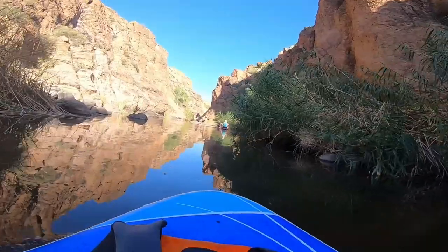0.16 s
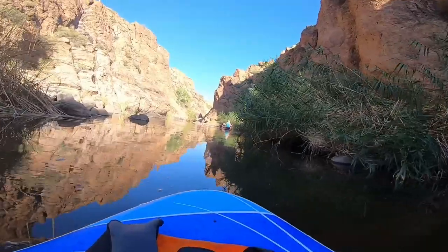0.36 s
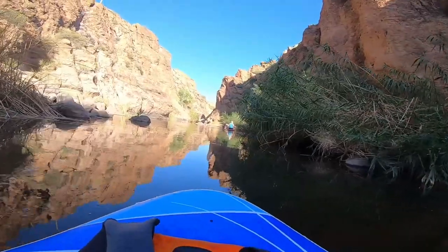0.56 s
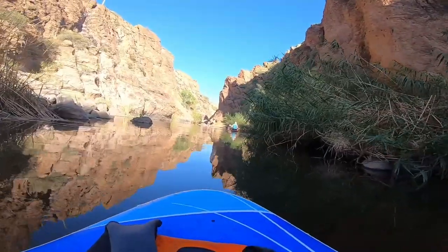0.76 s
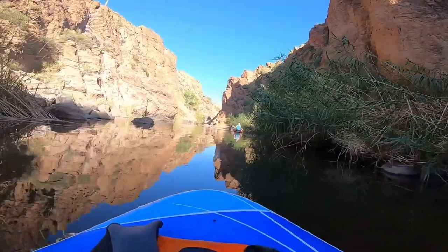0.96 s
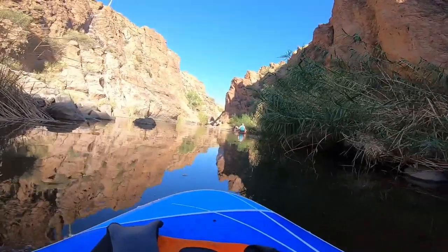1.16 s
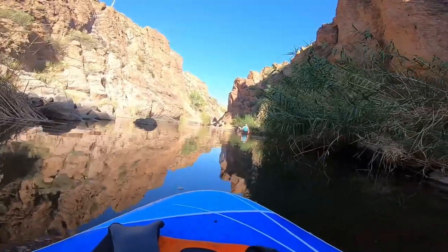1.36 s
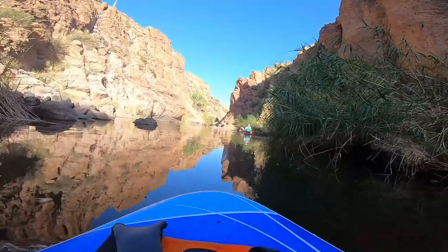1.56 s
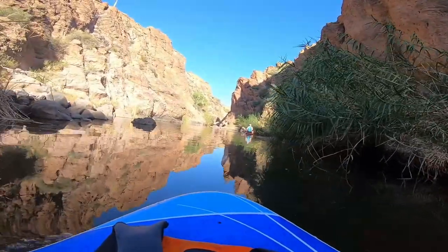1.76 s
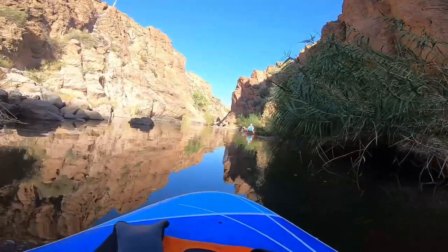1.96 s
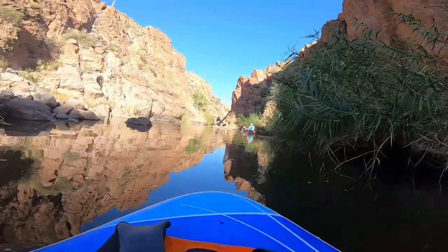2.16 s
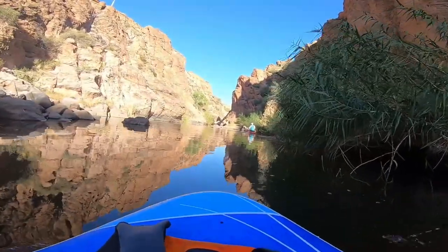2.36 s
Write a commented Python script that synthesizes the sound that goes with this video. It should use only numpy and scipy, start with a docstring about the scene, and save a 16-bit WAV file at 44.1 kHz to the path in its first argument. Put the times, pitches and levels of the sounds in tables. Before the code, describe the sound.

Close to a kayak on quiet water, a paddle splashes on the right, scattering drops and making one plop as dull puffs of air hit the microphone. The stirred water bubbles and trickles on, with soft hull knocks.

```python
"""Calm water, a stereo microphone close to a kayak's hull, a faint wash of water in the distance.
The paddle dips in on the right: bubbles ring, a short splash, a spatter of drops, then one deep plop
as an air pocket rises. Meanwhile puffs of air knock dully on the microphone's right port, then its left.
Behind the blade the stirred water gurgles and trickles along the hull, which thuds softly now and then,
and at last the wake thins to a fine fizz."""
import sys
import numpy as np
from scipy import signal
from scipy.fft import rfft, irfft
from scipy.io import wavfile
from scipy.ndimage import uniform_filter1d

SR = 44100
rng = np.random.default_rng(int(sys.argv[2]) if len(sys.argv) > 2 else 0)


def unload_wav(signal):
    """Save mono or channel-first audio to the path in sys.argv[1] as 16-bit WAV at rate SR, clipped to [-1, 1]."""
    wavfile.write(
        sys.argv[1],
        SR,
        np.round(np.clip(np.atleast_2d(signal).T, -1, 1) * 32767).astype(np.int16),
    )


N = 105840
TIME = np.arange(N) / SR
PORT_LAG_S = .00007   # sounds at the blade reach the left port later
# Where the stirred water lies: (time [s], left over right [dB])
WAKE_PAN = [(.75, -8), (1.15, -0.5), (1.9, -5.5)]
# Spectrum of the bubbles in the wake: (frequency [Hz], level [dB])
WAKE_COLOUR = [(170, -14), (370, -9), (800, -1), (1700, 0), (3000, -14), (5500, -22.5)]


def from_db(db):
    """Decibels to gain."""
    return 10 ** (np.asarray(db) / 20)


def rms_one(x):
    """Scale to unit rms."""
    return x / np.sqrt(np.mean(x ** 2) + 1e-20)


def decay(t, t60):
    """A fall of 60 dB every t60 seconds."""
    return np.exp(-np.log(1000) * t / t60)


def panned(pan_db):
    """Left and right gains of unit mean power; positive is left."""
    ratio = np.atleast_1d(from_db(pan_db))
    return np.array([ratio, np.ones_like(ratio)]) * np.sqrt(2 / (1 + ratio ** 2))


def in_time(curve):
    """Read a curve of (time, value) at every sample."""
    return np.interp(TIME, *np.transpose(curve))


def at_hz(colour, hz):
    """Read a spectrum of (frequency, level), in dB."""
    f, db = np.transpose(colour)
    return np.interp(np.log(np.maximum(hz, 1)), np.log(f), db)


def filtered(x, hz, kind):
    """A gentle Butterworth filter."""
    return signal.sosfilt(signal.butter(2, hz, kind, fs=SR, output="sos"), x)


def coloured(x, colour):
    """Shape a sound by a spectrum."""
    return irfft(rfft(x) * from_db(at_hz(colour, np.arange(N // 2 + 1) * SR / N)), N)


def noise(colour):
    """Coloured noise, unrelated in the two channels; rms 1."""
    return rms_one(coloured(rng.standard_normal((2, N)), colour))


def add(out, s, sound):
    """Mix a stereo sound in at s seconds."""
    i = int(np.clip(s * SR, 0, N - 1))
    out[:, i:i + sound.shape[1]] += sound[:, :N - i]


def left_later(x, lag_s):
    """Delay the left channel."""
    return np.array([np.interp(TIME - lag_s, TIME, x[0]), x[1]])


def bursts(rows, attack_s, t60):
    """Stereo envelope of events that rise, hold and die away."""
    power = 0
    for s, db, hold, pan in rows:
        t = TIME - s
        envelope = np.clip(t / attack_s, 0, 1) * decay(np.maximum(t - attack_s - hold, 0), t60)
        power = power + (panned(pan) * from_db(db) * envelope) ** 2
    return np.sqrt(power)


def ring(hz, t60, rise=0, onset_cycles=0.21):
    """The dying sine of a bubble or a hull mode; its pitch glides by the share `rise` per t60."""
    t = np.arange(int(t60 * SR) + 2) / SR
    phase = 2 * np.pi * hz * (t + rise * t * t / (2 * t60))
    return np.sin(phase) * decay(t, t60) * (1 - np.exp(-t * hz / onset_cycles))


def bubble_cloud(colour, cycles, rise, size_db, scatter_db, lag_s, count):
    """Many random bubbles, each with its own pitch, size, ring time and direction; rms 1."""
    out, low, high = np.zeros((2, N)), colour[0][0], colour[-1][0]
    draws = zip(rng.random((count, 4)), rng.standard_normal((count, 3)))
    for k, ((when, pitch, climb, size), (length, side, lag)) in enumerate(draws):
        hz = low * (high / low) ** pitch
        gain = from_db(at_hz(colour, hz) + size_db * min(-np.log(1 - size), np.pi)) * hz
        wave = gain * ring(hz, cycles * np.exp(.5 * length) / hz, rise * climb)
        shift = int(abs(lag * lag_s) * SR)   # the far port hears it later
        pair = np.zeros((2, len(wave) + shift))
        pair[int(lag > 0), :len(wave)] = wave
        pair[int(lag <= 0), shift:] = wave
        add(out, (k + when) / count * TIME[-1], pair * panned(scatter_db * side))
    return rms_one(filtered(out, low, "high"))


def spatter(colour, size_db, scatter_db, per_s, t60, clump_db=2.5):
    """Random ticks of falling droplets, mostly tiny, a few large, in clumps; rms 1."""
    hits = (rng.random(N) < per_s / SR) * from_db(size_db * np.minimum(rng.exponential(1, N), 5))
    clumps = from_db(clump_db * rms_one(uniform_filter1d(rng.standard_normal(N), size=700)))
    hits = hits * clumps * panned(scatter_db * rng.standard_normal(N))
    power = signal.lfilter([1], [1, -decay(1 / SR, t60) ** 2], hits ** 2 + 1e-18)
    ticks = coloured(np.sqrt(power) * rng.standard_normal(N), colour)
    return rms_one(filtered(ticks, colour[0][0], "high"))


def distant_water():
    """A smooth, steady wash from far off."""
    # Spectrum of the wash: (frequency [Hz], level [dB])
    colour = [(60, 5), (1300, 0.5), (3000, -4.5), (8000, -21)]
    return from_db(-67.5) * noise(colour)


def trickle():
    """Along the hull, tiny droplets tick dryly and foam bursts with brief pings."""
    # Strength of the trickle: (time [s], level [dB])
    levels = [(0, -54.5), (.15, -66.5), (.36, -50.5), (.47, -63), (.68, -72), (.85, -60.5), (1.02, -68.5),
              (1.2, -52.5), (1.28, -59.5), (1.46, -51.5), (1.93, -60.5), (2.1, -52.5), (2.4, -55)]
    # Spectrum of droplets and foam: (frequency [Hz], level [dB])
    colour = [(1800, 2.5), (4500, -8), (7500, -5.5), (10500, -8.5), (15000, -32)]
    ticks = spatter(colour, size_db=4, scatter_db=5, per_s=900, t60=.005)
    foam = bubble_cloud(colour, cycles=20, rise=0, size_db=5.5, scatter_db=3, lag_s=.0001, count=2500)
    fizz = left_later(ticks, PORT_LAG_S / 2) + from_db(-5) * foam
    return from_db(in_time(levels)) * panned(in_time(WAKE_PAN)) * fizz


def near_bubbles():
    """Single bubbles ring out close by, around the blade."""
    # Bubbles: (time [s], pitch [Hz], level [dB], t60 [s], rise per t60 [share], left over right [dB])
    bubbles = [(.038, 2826, -24.5, 0.014, -0.52, -14), (0.079, 3460, -25, 0.011, -0.15, -10),
               (0.272, 1580, -27.5, 0.031, 1.6, -31), (.537, 1262, -29, 0.039, 1.25, -19),
               (.551, 1290, -26.5, .022, 1.3, -41), (.597, 1120, -27, 0.013, 0.31, -32),
               (.639, 970, -38.5, 0.045, -0.3, -26), (0.678, 1027, -41.5, 0.093, -0.074, -26),
               (.963, 828, -24.5, 0.035, 0.26, -11), (0.975, 425, -36.5, 0.18, -0.062, 1),
               (.988, 1700, -20.5, 0.014, -0.05, -31), (1.055, 1020, -31, 0.047, -0.13, 10),
               (1.168, 1500, -26.5, 0.012, .3, 6), (1.177, 680, -38.5, 0.066, 0.19, 3),
               (1.209, 1080, -34.5, 0.074, 0.28, 0), (1.330, 1083, -30.5, 0.039, -0.014, -14),
               (1.414, 1615, -24, 0.034, 0.48, -20), (1.425, 1310, -25, 0.045, 0.48, -34),
               (1.564, 1210, -29, 0.038, 0.19, -11), (1.603, 5500, -30.5, 0.016, 0.34, -16),
               (1.624, 1753, -25, 0.034, 0.12, -23), (1.753, 822, -30.5, 0.088, -0.084, 4.5),
               (1.828, 1058, -32.5, 0.049, 0.042, 1), (2.251, 1120, -35.5, 0.053, 0.63, -8)]
    out = np.zeros((2, N))
    for s, hz, db, t60, rise, pan in bubbles:
        add(out, s, panned(pan) * from_db(db) * ring(hz, t60, rise))
    return out


def splashes():
    """The blade cuts the surface on the right: a dense, sharp crackle of torn water."""
    # Throws of water: (time [s], level [dB], hold [s], left over right [dB])
    throws = [(.070, -46.5, 0.008, -7.5), (.185, -42, 0.014, -14), (.197, -29, 0.017, -14.5),
              (.336, -41.5, 0.036, -22)]
    # Spectrum of the spray: (frequency [Hz], level [dB])
    colour = [(350, -36), (870, -2.5), (2250, 1.5), (4000, -12.5), (7400, -7), (15000, -32)]
    spray = spatter(colour, size_db=2.5, scatter_db=-0.5, per_s=3000, t60=.003)
    return bursts(throws, attack_s=0.0046, t60=0.098) * spray


def hull_thuds():
    """Dead centre, the soft hull thuds in its low modes and booms faintly when a wavelet lifts it."""
    # Dull knocks: (time [s], level [dB])
    knocks = [(0.079, -47), (.367, -45), (1.505, -36), (2.215, -46)]
    # Hull modes: (frequency [Hz], level [dB])
    modes = [(185, -3.5), (300, -3.5), (500, 2)]
    # Wavelets against the hull: (time [s], level [dB])
    bumps = [(1.027, -35), (1.383, -40), (2.204, -38)]
    out = np.zeros((2, N))
    for s, db in knocks:
        for hz, mode_db in modes:
            add(out, s, panned(0) * from_db(db + mode_db) * ring(hz, t60=0.031))
    for s, db in bumps:
        add(out, s, panned(0) * from_db(db) * ring(hz=45.5, t60=0.21))
    return out


def wake():
    """Middle-sized bubbles churn behind the blade."""
    # Strength of the churning: (time [s], level [dB])
    levels = [(.16, -56.5), (.27, -49), (.40, -46), (.47, -53), (.68, -58), (.85, -44.5), (1.13, -43),
              (1.28, -46), (1.5, -40), (1.92, -50), (2.4, -52)]
    churn = bubble_cloud(WAKE_COLOUR, cycles=25, rise=0.31, size_db=1.7,
                         scatter_db=5.5, lag_s=0.0001, count=4400)
    return from_db(in_time(levels)) * panned(in_time(WAKE_PAN)) * churn


def water_smacks():
    """Brief, broad ticks of water: drops landing, and the smack that opens the plop."""
    # Smacks on the surface: (time [s], peak level [dB], left over right [dB])
    smacks = [(0.177, -25.5, -7), (0.214, -23, 7), (0.338, -25, -5.5), (0.398, -27.5, -4),
              (.426, -29.5, -6), (0.488, -24, -3.5), (.597, -48, -2), (0.631, -48, -6), (1.075, -41.5, 23),
              (1.422, -28.5, 15), (1.489, -34, -17), (1.552, -34.5, -22), (1.647, -34.5, -5.5),
              (1.685, -31.5, 9.5), (1.768, -30.5, 8.5)]
    band_hz = [5730 / 2 ** 0.53, 5730 * 2 ** 0.53]
    out, t = np.zeros((2, N)), TIME[:N // 100]
    for s, db, pan in smacks:
        tick = filtered(rng.standard_normal(len(t)) * decay(t, t60=0.017), band_hz, "band")
        add(out, s, panned(pan) * from_db(db) * tick / np.abs(tick).max())
    return out


def air_on_microphone():
    """Puffs of air buffet the right port, then the left, over a faint rumble of breeze."""
    # Puffs: (time [s], level [dB], hold [s], left over right [dB])
    puffs = [(.265, -35, 0.035, -15), (.368, -35.5, 0.016, -9.5), (.405, -26, 0.04, -16),
             (.64, -35, 0.076, -1), (.69, -32, 0.049, 14), (.775, -29, 0.089, 16.5)]
    # Spectrum of the puffs: (frequency [Hz], level [dB])
    puff_colour = [(15, -10), (62, 0), (120, -9), (180, -19), (300, -35), (2000, -100)]
    # The breeze coming up: (time [s], level [dB])
    breeze_levels = [(.2, -88), (.4, -51)]
    # Spectrum of the breeze: (frequency [Hz], level [dB])
    breeze_colour = [(15, -3.5), (35, 9), (75, -18), (250, -21.5), (2000, -105)]
    eddies = noise(puff_colour)
    eddies /= np.sqrt(uniform_filter1d(eddies ** 2, size=2205, axis=1))   # level evened over 50 ms
    breeze = from_db(in_time(breeze_levels)) * noise(breeze_colour)
    return bursts(puffs, attack_s=0.0093, t60=0.11) * eddies + breeze


def plop():
    """A large air pocket pinches off with a bright tick, rings low, climbs in pitch and bursts."""
    start_s, life_s, start_hz, rise, pan_db = .489, 0.0557, 601.4, 0.645, -10
    t = np.maximum(TIME - start_s, 0)
    age = np.minimum(t / life_s, 2)
    hz = start_hz * (1 + rise * age ** 3 / (1 + age ** 2 / 2))
    pocket = np.sin(2 * np.pi * np.cumsum(hz * (t > 0)) / SR) / (1 + age ** 10)
    deeper_ring = from_db(-23) * np.sin(2 * np.pi * 405 * t)
    out = panned(pan_db) * from_db(-21.5) * decay(t, t60=0.16) * (pocket + deeper_ring)
    pinch = from_db(2.5) * ring(hz=7020, t60=0.0015, rise=0.15, onset_cycles=1.46)
    add(out, start_s, panned(pan_db) * pinch)
    return out


def gurgles():
    """Eddies collapse in tight clusters of short-lived bubbles."""
    # Collapses: (time [s], level [dB], hold [s], left over right [dB])
    collapses = [(.763, -48.5, 0.0078, -5), (.963, -41.5, 0.0083, -12), (1.413, -41, 0.026, 2),
                 (1.748, -39, 0.021, 0.5), (1.865, -43.5, 0.003, -5)]
    bubbles = bubble_cloud(WAKE_COLOUR, cycles=12.4, rise=0.8, size_db=4,
                           scatter_db=-2.0, lag_s=.00008, count=5000)
    return bursts(collapses, attack_s=0.0022, t60=0.1) * bubbles


def echoes(x):
    """The hull and the banks scatter back a short, dull tail."""
    tail = rng.standard_normal((2, N // 4)) * decay(TIME[:N // 4], t60=0.27)
    tail = filtered(tail / np.sqrt(np.sum(tail ** 2) / 2), 5800, "low")
    return from_db(-13) * signal.fftconvolve(x.mean(axis=0)[None], tail, axes=1)[:, :N]


def scene():
    """Close water and its echoes, the hull, air on the ports and the distant wash."""
    at_blade = left_later(near_bubbles() + splashes() + water_smacks() + plop(), PORT_LAG_S)
    water = at_blade + gurgles() + wake() + trickle()
    return water + echoes(water) + hull_thuds() + air_on_microphone() + distant_water()


def record(dry):
    """The microphone's treble rolls off and the top is cut steeply."""
    rolloff_hz, cutoff_hz = 10740, 15800
    steep_cut = signal.ellip(10, .1, 80, cutoff_hz, fs=SR, output="sos")
    return signal.sosfilt(steep_cut, filtered(dry, rolloff_hz, "low"))


dry = scene()
out = record(dry)
unload_wav(out)
```